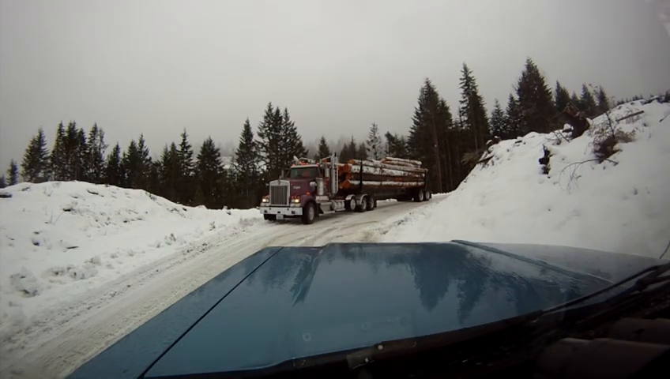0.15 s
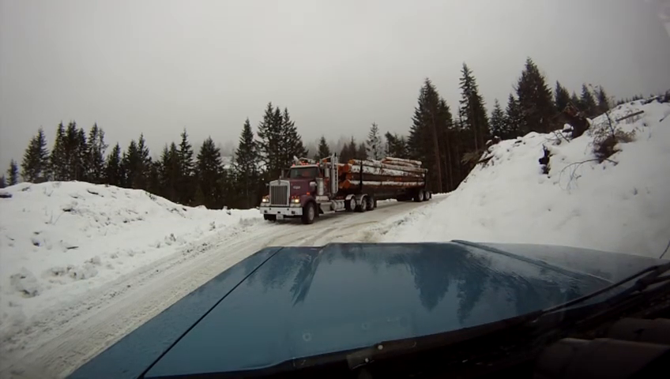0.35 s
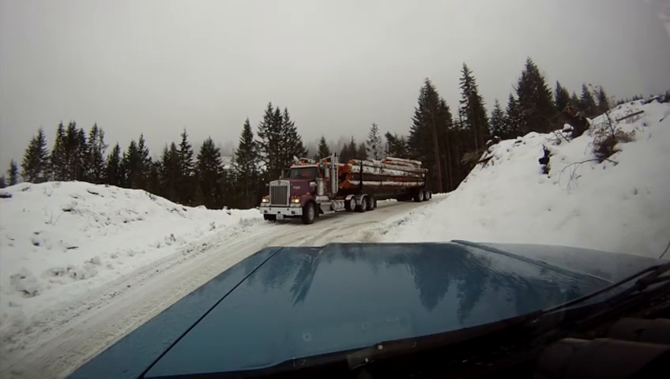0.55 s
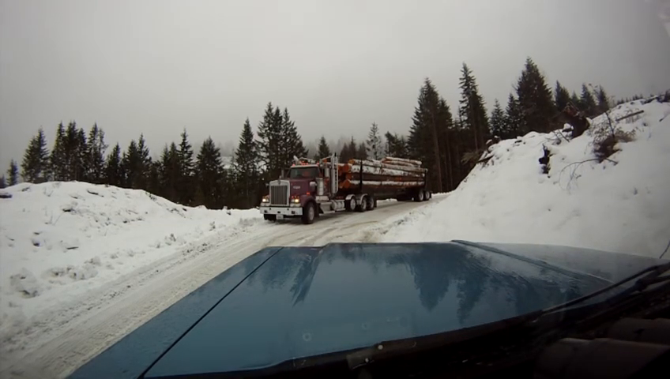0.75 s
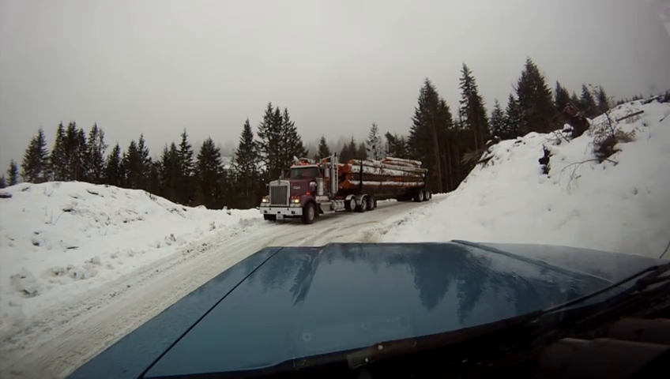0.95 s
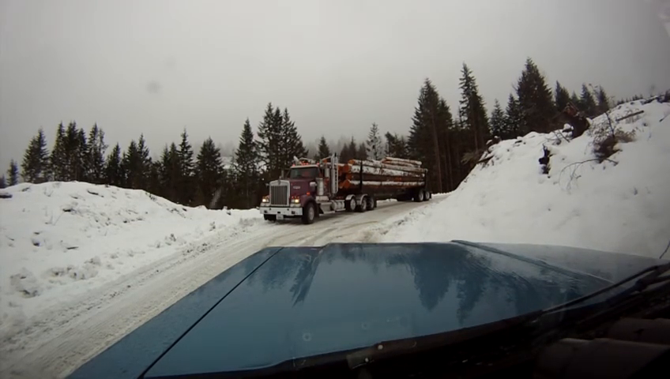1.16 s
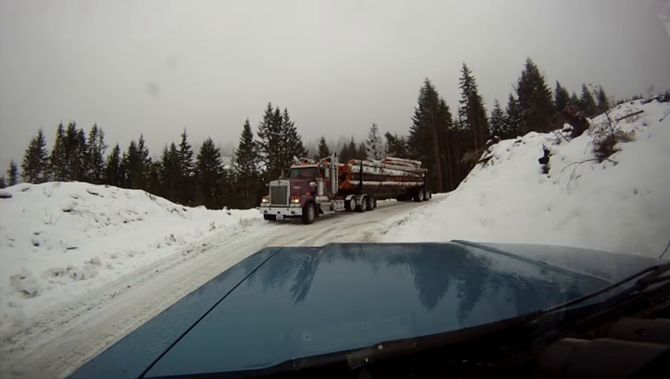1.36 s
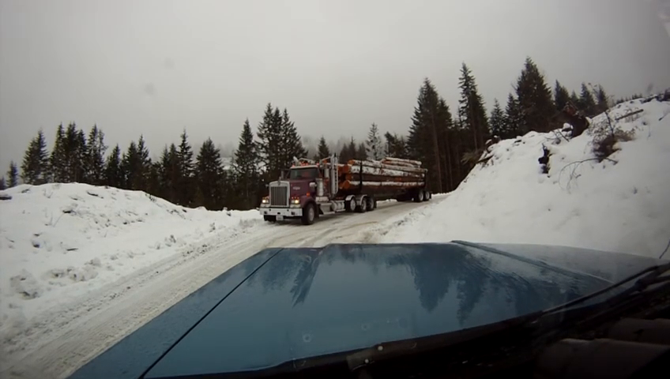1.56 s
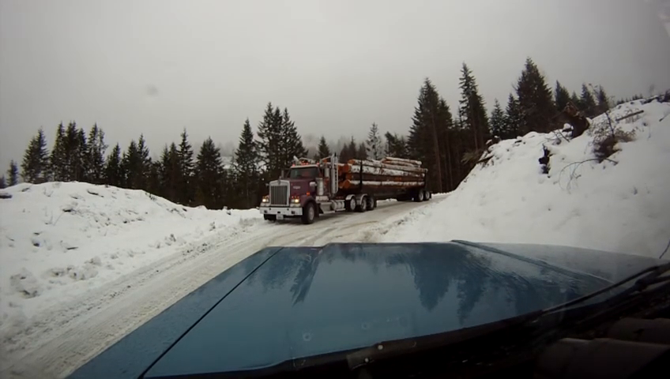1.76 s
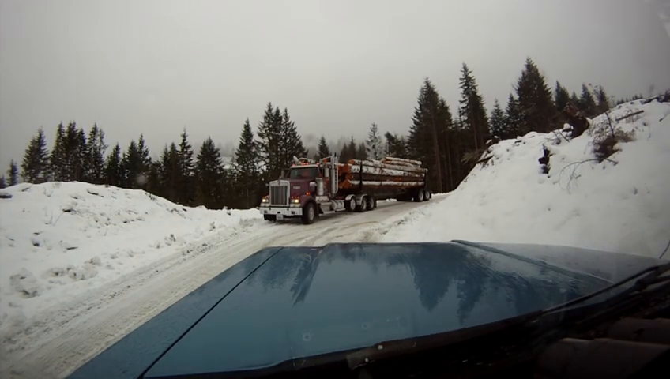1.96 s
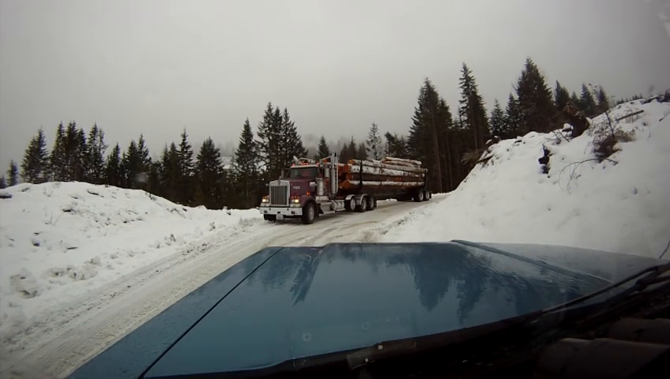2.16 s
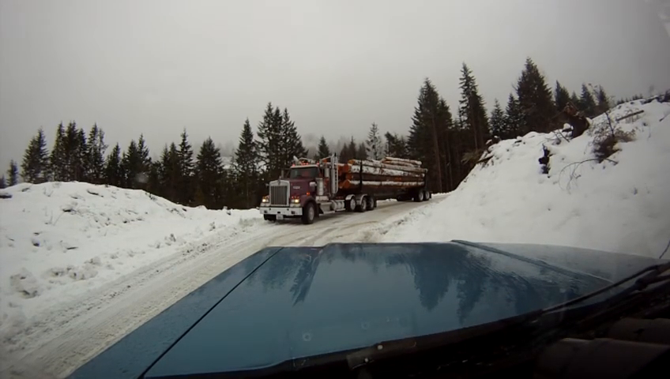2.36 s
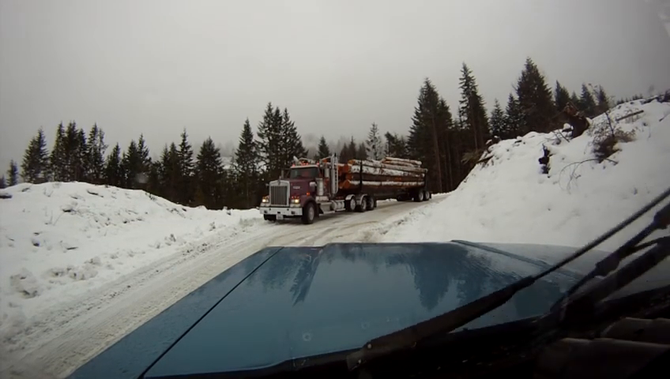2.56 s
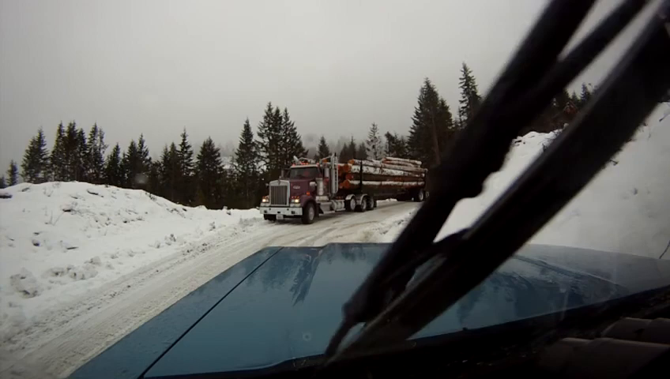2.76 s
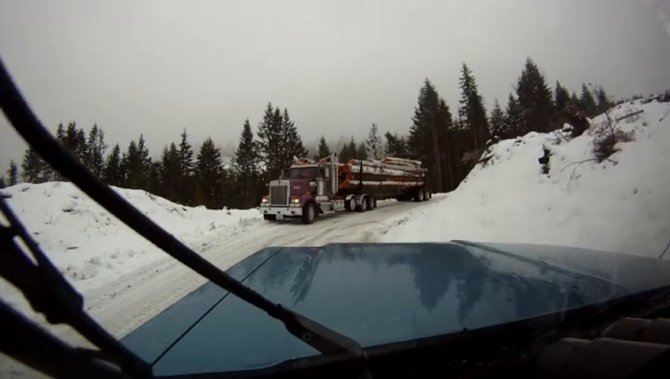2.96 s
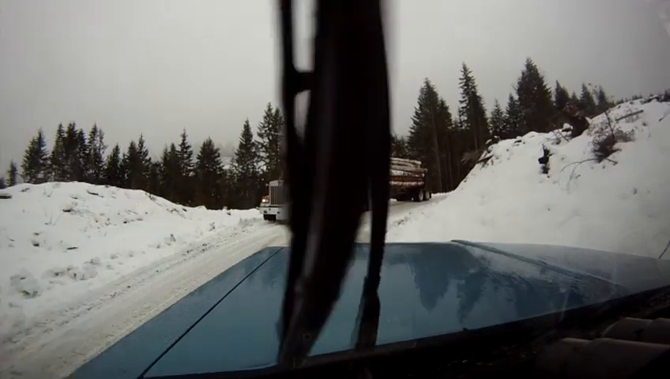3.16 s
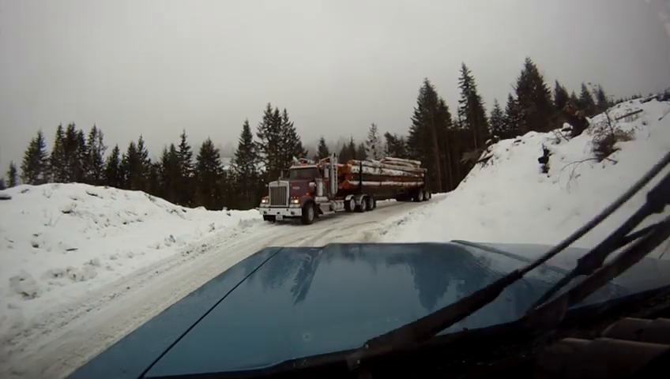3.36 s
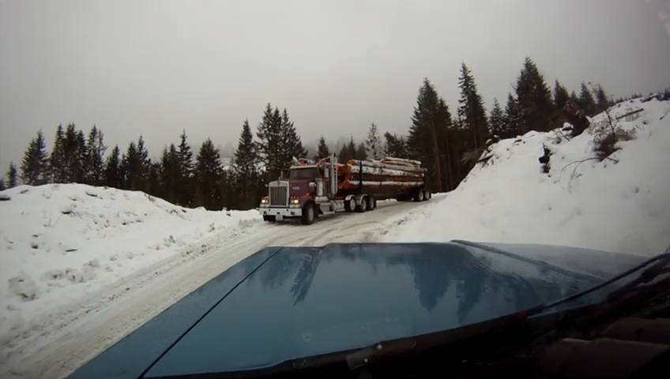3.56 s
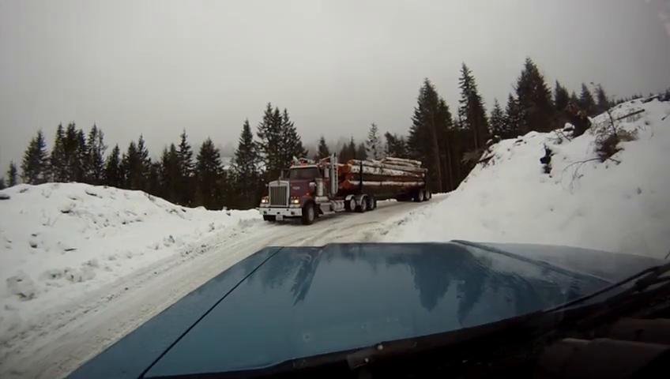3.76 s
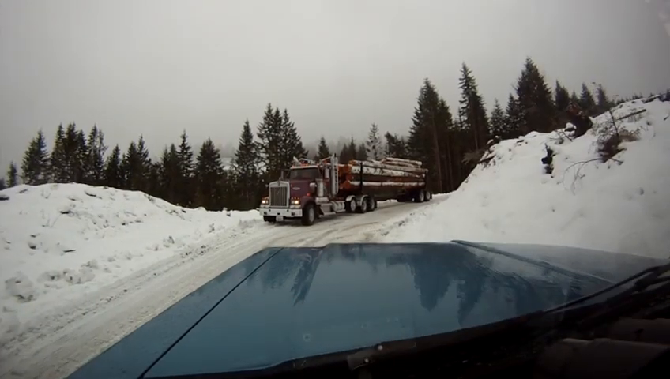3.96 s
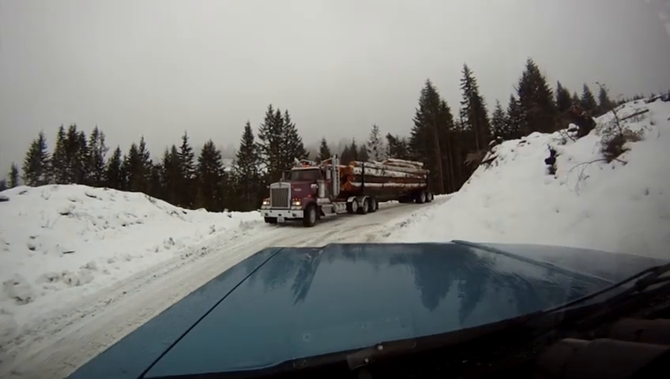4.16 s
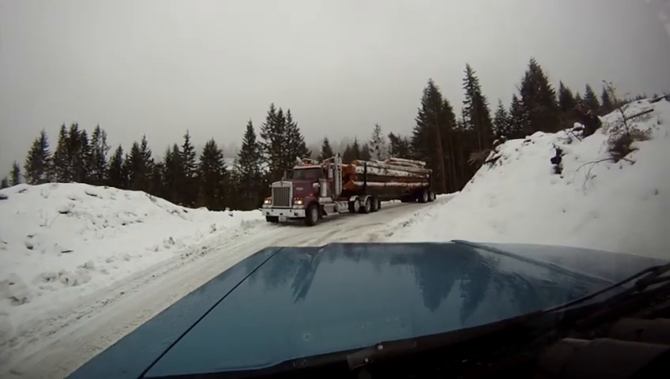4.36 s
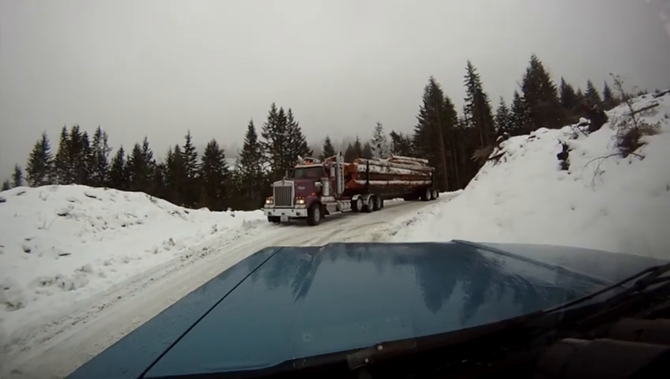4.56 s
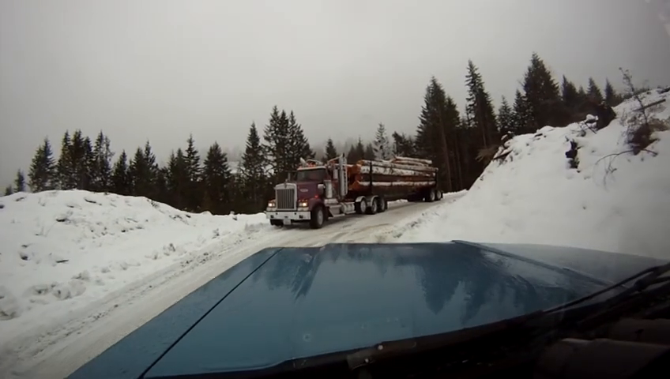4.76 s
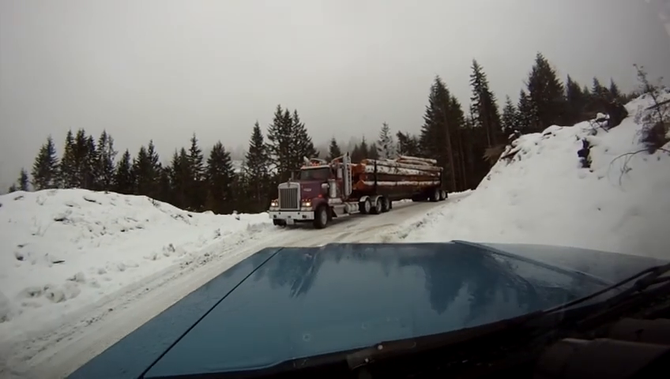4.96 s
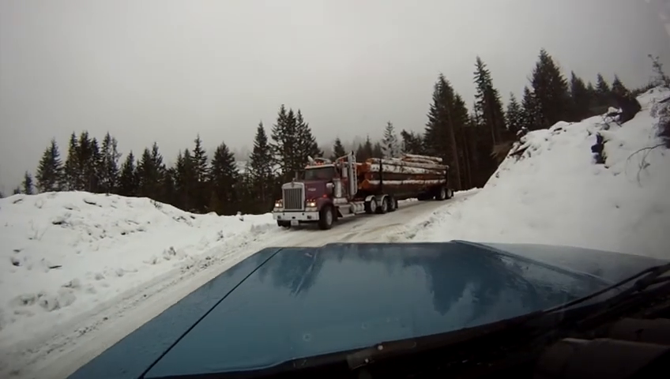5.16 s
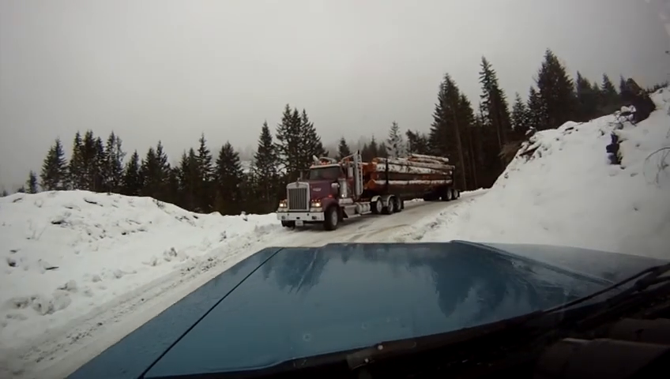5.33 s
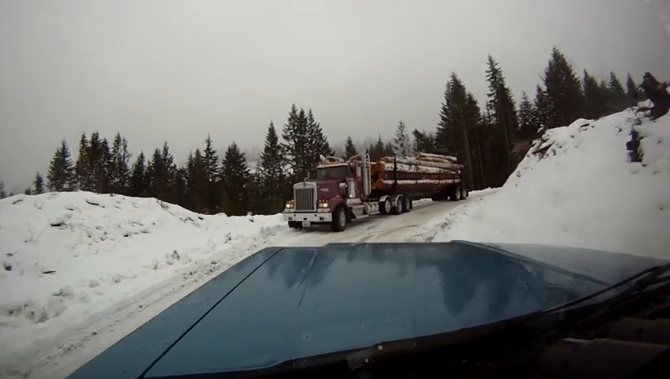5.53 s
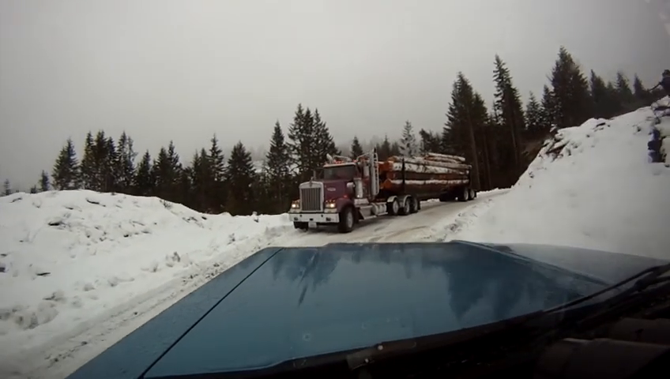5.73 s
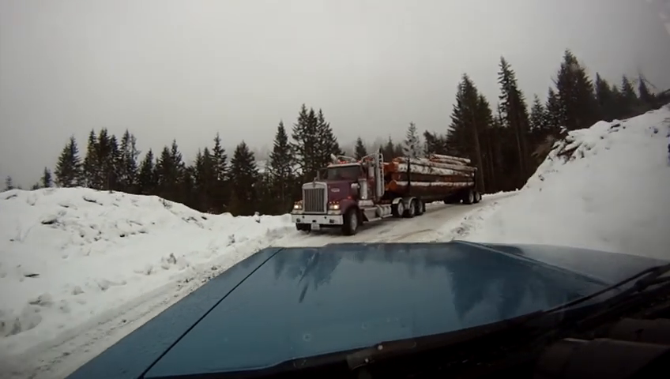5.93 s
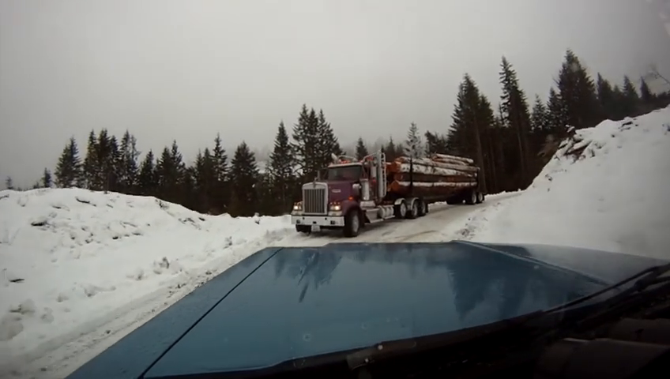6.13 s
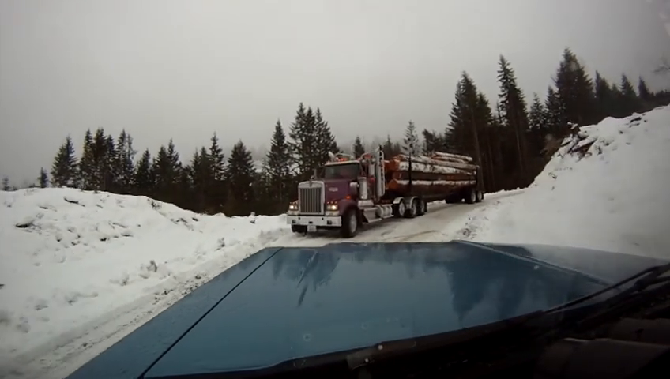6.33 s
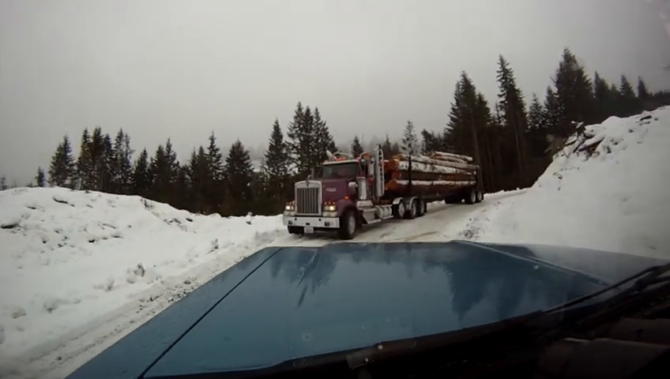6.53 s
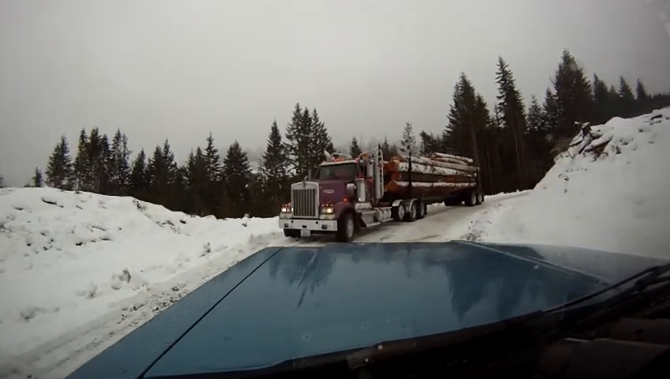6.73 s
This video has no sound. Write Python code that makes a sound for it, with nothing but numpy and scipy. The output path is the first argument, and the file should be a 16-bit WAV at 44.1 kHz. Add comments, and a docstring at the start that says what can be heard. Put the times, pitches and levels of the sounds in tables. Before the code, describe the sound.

Steady low diesel rumble in a vehicle cab, with a burst of hard knocks and wiper squeaks near three seconds, then a calmer, lugging pull.

```python
"""Diesel pickup on a snowy road

Inside the cab, a six-cylinder diesel thuds, buzzes and clatters: sines locked to its firings plus shaped noise.
Filtered noise makes the road's drumming and sway; damped sines make the cab boom at each jolt.
Loose gear knocks and scrapes on the dash, trim ticks (noise bursts), and wiper blades rub and squeak.
A dash camera with a coarse sample-and-hold converter picks it all up."""
import sys
import numpy as np
from scipy import signal
from scipy.fft import rfft, irfft, next_fast_len
from scipy.io import wavfile
from scipy.ndimage import map_coordinates

SR = 44100
rng = np.random.default_rng(int(sys.argv[2]) if len(sys.argv) > 2 else 0)


def store_wav(level_fs):
    """Save 16-bit WAV to argv[1]."""
    pcm = np.round(np.clip(np.atleast_2d(level_fs), -1, 1) * 32767)
    wavfile.write(sys.argv[1], SR, pcm.T.astype(np.int16))


N = 303849


def amp(db):
    """Level in dB to linear gain."""
    return 10 ** (np.asarray(db) / 20)


def unit(x):
    """Scale to an RMS of one."""
    return x / np.sqrt(np.mean(x ** 2) + 1e-20)


def along(points, hz):
    """Read a curve of (frequency [Hz], value) points on a log frequency axis."""
    f, v = np.transpose(points)
    return np.interp(np.log(hz + 1), np.log(f + 1), v)


def curve(points, lag_s=0):
    """Draw (time [s], value) points as one value per sample, optionally late."""
    s, value = np.transpose(points)
    return np.interp(np.arange(N) / SR - lag_s, s, value)


def wobble(rate):
    """A smooth random curve, rate knots a second."""
    knots = rng.standard_normal(int(N * rate / SR) + 4)
    return map_coordinates(knots, [np.arange(N) * rate / SR])


def swell(s, half):
    """A bell-shaped rise and fall around time s, down to 1/e at half seconds either side."""
    distance = (np.arange(N) / SR - s) / half
    return np.exp(-np.minimum(distance ** 2, 50))


def lift_db(modes, hz):
    """Gain of narrow resonances over a smooth colour."""
    return sum(db / (1 + (2 * (hz - centre) / width) ** 2) for centre, width, db in modes)


def coloured(x, db_of):
    """x through the causal minimum-phase filter whose gain in dB is db_of(Hz)."""
    m = 2 * next_fast_len(len(x))
    cepstrum = irfft(np.log(amp(db_of(np.fft.rfftfreq(m, 1 / SR))) + 1e-6))
    # fold the cepstrum forward in time, so the filter never rings before its cause
    cepstrum[1:m // 2] *= 2
    cepstrum[m // 2 + 1:] = 0
    return irfft(rfft(x, m) * np.exp(rfft(cepstrum)))[:len(x)]


def add(track, s, sound):
    """Mix a sound into the track at time s."""
    part = track[round(s * SR):][:len(sound)]
    part += sound[:len(part)]


# load on the engine, eased off and then opened to pull away: (time [s], level over idle [dB])
LOAD_CURVE = [(0, -0.5), (1.9, 1.2), (2.3, -1), (3.2, -0.5), (3.32, 3.5), (6.89, 3)]


def engine_load(lag_s=0):
    """Load over idle in dB; it drives the engine directly and the road noise with a lag."""
    return curve(LOAD_CURVE, lag_s)


# drumming of the cab: (frequency [Hz], relative level [dB])
DRUM_COLOUR = [(20, -41), (45, -27), (62, -4.5), (100, 2), (170, -1.5), (228, 4), (262, -8.5), (310, -17.5),
               (420, -28), (900, -50)]
# sway of the body on its springs: (frequency [Hz], relative level [dB])
SWAY_COLOUR = [(8, -12), (24, 8.5), (45, -6), (65, -7), (150, -64.5)]
# ruts under the wheels: (time [s], half length [s], drumming level [dB], sway level [dB])
RUT_HITS = [(0.853, 0.28, -32.5, -43), (1.32, .12, -46, -30), (1.677, 0.11, -24.5, -22),
            (2.102, 0.045, -25, -38), (2.903, 0.064, -21, -29), (4.75, 0.27, -41, -34),
            (6.095, 0.084, -28, -30)]
DRUM_DB, SWAY_DB = -38, -41.5  # levels at idle load
DRUM_GROWS, SWAY_GROWS = 1.05, 2.4  # dB of each per dB of load
ROLL_LAG_S = 0.26  # the wheels follow the throttle this much later


def road(uneven_db=1.0):
    """Tyres on snow rock the body and make the cab drum, more under load and in every rut."""
    load_db = engine_load(ROLL_LAG_S)
    drum = amp(DRUM_DB + DRUM_GROWS * load_db)
    sway = amp(SWAY_DB + SWAY_GROWS * load_db)
    for s, half, drum_db, sway_db in RUT_HITS:
        rut = swell(s, half)
        drum = np.hypot(drum, amp(drum_db) * rut)
        sway = np.hypot(sway, amp(sway_db) * rut)

    def noise(colour):
        return unit(coloured(rng.standard_normal(N), lambda hz: along(colour, hz)))

    return drum * amp(uneven_db * wobble(10)) * noise(DRUM_COLOUR) + sway * noise(SWAY_COLOUR)


# low modes of the cab: (frequency [Hz], level [dB], t60 [s])
CAB_RESONANCES = [(75.5, -3.5, 0.14), (112, -2.5, 0.13), (151, -2, 0.069), (193.2, -1.5, 0.2),
                  (229.9, 0, 0.24)]
# jolts that ring the cab: (time [s], level [dB], rise [s], favoured pitch [Hz], reach around it [octaves])
CAB_JOLTS = [(.66, -23, 0.01, 233, 0.2), (0.823, -17.5, 0.0053, 226, 0.11), (.994, -20, 0.0052, 230, .12),
             (1.155, -22.5, .022, 227, 0.22), (1.532, -5, 0.0015, 70, 1.07), (1.752, -24, 0.021, 232, .12),
             (1.825, -20, 0.013, 229, 0.19), (1.894, -21, 0.027, 229, .12), (2.07, -17, 0.0015, 220, 1.1),
             (2.521, -16, .015, 150, 0.92), (2.785, -14.5, 0.016, 190, 0.23),
             (2.863, -6.5, .0024, 149, 0.22), (2.89, -15, .01, 196, 0.073), (2.982, -19, .012, 190, 0.16),
             (6.045, -17.5, 0.0044, 125, 1)]


def booms(rough_db=2.0):
    """Each jolt sets the low modes of the cab swinging unevenly, most of all those near its favoured pitch."""
    out, t = np.zeros(N), np.arange(SR // 2) / SR
    shudder = amp(rough_db * wobble(60))
    for s, db, rise, favoured_hz, reach in CAB_JOLTS:
        for hz, mode_db, t60 in CAB_RESONANCES:
            envelope = (1 - np.exp(-t / rise)) * amp(-60 * t / t60)
            envelope = envelope / envelope.max()
            share = np.exp(-abs(np.log2(hz / favoured_hz)) / reach)
            add(out, s, amp(db + mode_db) * share * envelope * np.sin(2 * np.pi * hz * t))
    return out * shudder


# small ticks of trim: (time [s], level [dB])
TRIM_TICKS = [(0.155, -50), (1.1258, -49), (2.9924, -46), (4.7301, -46.5), (4.807, -48.5), (5.8232, -57),
              (5.914, -59), (6.0397, -48)]


def ticks(t60=0.058):
    """Plastic trim ticks faintly as the body flexes: short decaying bursts of treble noise."""
    out, t = np.zeros(N), np.arange(SR // 16) / SR
    plastic = [(1000, -13), (3500, -2), (5500, 2), (6500, -18)]  # (frequency [Hz], relative level [dB])
    for s, db in TRIM_TICKS:
        noise = unit(coloured(rng.standard_normal(len(t)), lambda hz: along(plastic, hz)))
        add(out, s, amp(db) * noise * amp(-60 * t / t60))
    return out


# squeaks of the wiper blades: (time [s], half length [s], pitch at that time [Hz], level [dB])
BLADE_SQUEAKS = [(2.66, .05, 2910, -46.5), (2.708, 0.013, 2430, -39), (2.756, 0.016, 2410, -27.5),
                 (2.787, 0.023, 5550, -43.5)]
# the blades rub over drier glass: (time [s], half length [s], level [dB])
BLADE_RUBS = [(2.8, 0.068, -37), (3.057, 0.061, -37), (3.128, 0.02, -30), (3.218, .025, -41.5)]
# colour of rubber on glass: (frequency [Hz], relative level [dB])
RUBBER_COLOUR = [(800, -36), (2300, 12), (3600, 2.5), (4500, -18), (5600, -13), (6500, -35)]
SAG_OCTAVES_PER_S = 0.37  # a squeak falls as the blade drags


def wiper(waver_hz=90, hoarse_db=3.0, stutter_db=3.0):
    """Rubber drags over the glass, rubbing in patches and catching in hoarse, falling squeaks."""
    t, squeak = np.arange(N) / SR, np.zeros(N)
    waver = waver_hz * wobble(500)
    for s, half, hz, db in BLADE_SQUEAKS:
        pitch = hz * 2 ** (-SAG_OCTAVES_PER_S * (t - s)) + waver
        tone = np.sqrt(2) * np.sin(2 * np.pi * np.cumsum(pitch) / SR)
        squeak += amp(db) * swell(s, half) * tone
    pressure = sum(amp(db) * swell(s, half) for s, half, db in BLADE_RUBS)
    rub = unit(coloured(rng.standard_normal(N), lambda hz: along(RUBBER_COLOUR, hz)))
    return amp(hoarse_db * wobble(150)) * squeak + pressure * amp(stutter_db * wobble(70)) * rub


# colour of the dash when struck: (frequency [Hz], relative level [dB])
DASH_COLOUR = [(60, -5.5), (220, 6.5), (400, -15.5), (700, -7.5), (1100, 0), (1600, -13.5), (2100, -1),
               (2700, -11), (3500, -13), (4400, -26), (5800, -26)]
# modes of the dash: (frequency [Hz], width [Hz], lift [dB])
DASH_RESONANCES = [(640, 20, 7.5), (1109, 30, 7), (1520, 176, 9.5), (1842, 304, 9), (2098, 21, 6.5),
                   (2580, 37, -4), (3070, 52, 4)]


def contacts(envelope, ring_hz, hard_db, ring_db, grain_db, spot_db=5, ring_width=0.062):
    """A crowd of tiny contacts under an envelope excites the dash; the spot that is hit favours one ring."""
    n = len(envelope)
    # grain levels change every 32 samples
    grain_levels_db = grain_db * rng.standard_normal(n // 32 + 1).repeat(32)[:n]
    grains = unit(rng.standard_normal(n) * amp(grain_levels_db))
    ring = (ring_hz, ring_width * ring_hz, ring_db)
    spot = (ring_hz, ring_hz, spot_db)
    modes = [*DASH_RESONANCES, ring, spot]

    def colour_db(hz):
        # hard contacts are brighter and thinner
        tilt = hard_db * along([(400, -0.39), (2200, -0.14), (4000, 0.81)], hz)
        return along(DASH_COLOUR, hz) + lift_db(modes, hz) + tilt

    sound = coloured(grains * envelope, colour_db)
    return unit(sound) * np.sqrt(np.mean(envelope ** 2))


# scrapes on the dash: (time [s], length [s], level [dB], strongest ring [Hz], hardness [dB, scales treble tilt])
DASH_SCRAPES = [(0.907, 0.08, -26, 1280, 1), (1.545, .125, -25.5, 1600, 3.5), (1.926, 0.093, -32, 2220, -2),
                (2.512, 0.04, -17.5, 1020, -11.5), (2.736, 0.056, -26, 2020, -2),
                (2.793, .03, -22.5, 1950, -3), (2.88, 0.05, -13, 1620, 2), (3.053, 0.017, -17.5, 1380, -4),
                (6.62, 0.051, -53, 3740, 9), (6.739, 0.063, -51, 4170, 6)]


def scrapes(spread=0.71, stutter_db=2.5):
    """Things stick and slip over the dash in swelling and fading strokes."""
    out, t = np.zeros(N), np.arange(SR // 2) / SR
    for s, length, db, hz, hard_db in DASH_SCRAPES:
        stroke = np.exp(-((t - length) / (spread * length)) ** 2)
        slips = unit(amp(stutter_db * wobble(192)[:len(t)]))
        sound = contacts(stroke * slips, hz, hard_db, ring_db=4.5, grain_db=1.0)
        add(out, s - length / 2, amp(db) * sound)  # the stroke peaks half a length after s
    return out


# knocks: (time [s], chatter length [s], level [dB], strongest ring [Hz],
#          hardness [dB, scales treble tilt], flight to the rebound [s], loss at the rebound [dB])
DASH_KNOCKS = [(0.674, 0.012, -18, 1130, 0.5, .012, 9), (1.197, 0.0016, -15.5, 1060, -9.5, .014, 7),
               (1.529, 0.0037, -8, 2380, 5, .028, 9), (1.733, 0.006, -22.5, 1063, 2.5, 0.015, 2.5),
               (1.826, 0.011, -8.5, 1180, -10, .009, 15), (1.914, 0.008, -25, 2050, -6.5, 0.026, 5),
               (2.07, 0.0063, -15.5, 1250, -5, .018, 4.5), (2.86, 0.0036, -6.5, 1164, 3.5, .033, 8),
               (3.069, 0.0034, -0.5, 1960, 6, .045, 18.5)]
CRACK_S, CRACK_DB, CRACK_PER_HARD_DB = 0.0019, -17, 2.3  # decay, level re knock, dB per dB of hardness
REBOUND_CHATTER_S, REBOUND_HARDER_DB = 0.0069, 0.5  # a rebound chatters briefly and sounds thinner


def knocks(t60=0.051, rise=0.000057):
    """Loose gear hits with a crack, chatters for a few milliseconds, rebounds once and leaves the dash ringing."""
    out, t = np.zeros(N), np.arange(SR // 5) / SR

    def blow(length, hz, hard_db):
        envelope = (1 - np.exp(-t / rise)) * amp(-60 * np.maximum(t - length, 0) / t60)
        return contacts(envelope, hz, hard_db, ring_db=9.0, grain_db=0.0)

    for s, length, db, hz, hard_db, flight, loss_db in DASH_KNOCKS:
        add(out, s, amp(db) * blow(length, hz, hard_db))
        crack = np.exp(-t / CRACK_S) * rng.standard_normal(len(t))
        add(out, s, amp(db + CRACK_DB + CRACK_PER_HARD_DB * hard_db) * crack)
        rebound = blow(REBOUND_CHATTER_S, hz, hard_db + REBOUND_HARDER_DB)
        add(out, s + flight, amp(db - loss_db) * rebound)
    return out


# colour of the clatter behind the firewall: (frequency [Hz], relative level [dB])
CLATTER_COLOUR = [(200, -38), (330, -24.5), (460, -26.5), (600, -11), (780, -15.5), (950, -5.5), (1160, 1),
                  (1350, -3), (1480, -10.5), (1700, -14), (1950, 1.5), (2130, -3.5), (2300, -18),
                  (2500, -21.5), (3300, -32), (4300, -40.5), (5500, -42), (6000, -63)]
# narrow rings of block and cab: (frequency [Hz], width [Hz], lift [dB])
BLOCK_RINGS = [(570, 15, 6), (868.4, 12.3, 13), (2424, 107, 7.5), (2786, 175, 10), (3160, 47, 8),
               (3623, 350, 9)]


def clatter(firings, rate, alike=0.22, swing_db=10, scatter_db=1.0, cylinder_db=0.5):
    """Each firing rattles the block: partly the same way every time, partly anew."""
    index, part = firings.astype(int), firings % 1
    pattern = rng.standard_normal(SR // 8)
    repeated = np.interp(part / rate * SR, np.arange(len(pattern)), pattern)
    rattle = np.sqrt(alike) * repeated + np.sqrt(1 - alike) * rng.standard_normal(N)
    cylinders = unit(rng.standard_normal(size=6))
    size_db = cylinder_db * cylinders[index % 6] + scatter_db * rng.standard_normal(size=1000)[index]
    # the engine bay smears each firing into a quick swell and a slower fade
    swell_db = swing_db * np.interp(part, [0, 1 / 4, 1 / 2, 1], [-1.01, -0.22, -0.27, -0.64])
    bursts = rattle * amp(size_db + swell_db)
    return unit(coloured(bursts, lambda hz: along(CLATTER_COLOUR, hz) + lift_db(BLOCK_RINGS, hz)))


# engine speed: (time [s], firing rate [Hz])
FIRING_RATE = [(0, 41.1), (2.7, 42.4), (3.1, 45.2), (3.6, 39.4), (4.05, 39.2), (4.35, 38.4), (5.0, 36.9),
               (5.5, 39.7), (5.9, 40.3), (6.1, 41.8), (6.55, 43.8), (6.89, 43.3)]
# smooth engine orders: (multiple of the firing rate, level [dB])
THUD_ORDERS = [(1, -1), (2, -9.5), (3, -18.5), (4, -23.5)]
# panels that buzz when an engine order meets them: (multiple of the firing rate, panel [Hz], width [Hz], level [dB])
BUZZING_PANELS = [(6, 246, 16.7, -39), (21, 862, 20, -45.5), (18, 740, 49, -53), (28, 1150, 28, -49),
                  (27, 1160, 14, -33.5)]
CLATTER_DB, THUD_DB = -34, -35  # combustion clatter and firing thud at idle load
THUD_GROWS = 0.94  # dB of thud per dB of load
THUD_FADES = 1.8  # off the throttle the thud falls away faster: extra dB per dB of load below idle
LUG_HZ, LUG_DB, LUG_WIDTH_HZ = 39.7, 4.5, 0.76  # dragged below this firing rate, it lugs and thuds harder


def engine(unsteady=0.002884):
    """Firing thud, panel buzz and diesel clatter, locked to the crankshaft; thud and clatter follow the load."""
    rate = curve(FIRING_RATE)
    load_db = engine_load()
    lug_db = LUG_DB / (1 + np.exp((rate - LUG_HZ) / LUG_WIDTH_HZ))
    thud_db = THUD_DB + THUD_GROWS * load_db + THUD_FADES * np.minimum(load_db, 0) + lug_db
    rate = rate * (1 + unsteady * wobble(12))
    firings = np.cumsum(rate) / SR

    def tone(order):
        return np.sqrt(2) * np.sin(2 * np.pi * order * firings)

    thud = sum(amp(db + 1.8 * wobble(7)) * tone(order) for order, db in THUD_ORDERS)
    buzz = np.zeros(N)
    for order, hz, width, db in BUZZING_PANELS:
        detuning = 2 * (order * rate - hz) / width
        buzz += amp(db + 2.3 * wobble(22)) * tone(order) / np.hypot(1, detuning)
    return amp(thud_db) * thud + buzz + amp(CLATTER_DB + load_db) * clatter(firings, rate)


def scene():
    """The whole cab, background first, as one channel."""
    return (road() + booms() + ticks() + wiper() + scrapes() + knocks() + engine())[None]


DUCK_DB, DUCK_SHARE = -21, 0.34  # threshold, share of the excess removed
DUCK_LAG_S, DUCK_RELEASE_S = 0.0145, 0.087  # delay, time constant of the level meter


def gain_control(x):
    """The camera turns itself down after a loud bang and soon recovers."""
    keep = np.exp(-1 / (DUCK_RELEASE_S * SR))
    power = signal.lfilter([1 - keep], [1, -keep], x[0] ** 2)
    level_db = 10 * np.log10(power + 1e-12)
    t = np.arange(N) / SR
    excess_db = np.interp(t - DUCK_LAG_S, t, np.maximum(level_db - DUCK_DB, 0))
    return x * amp(-DUCK_SHARE * excess_db)


TOP_HZ = 15450  # nothing passes above this


def record(dry):
    """The camera ducks, clips, samples at 12 kHz and holds each value, which mirrors sound into the treble."""
    fine = signal.resample_poly(gain_control(dry), 160, 147, axis=1)  # 44.1 to 48 kHz
    coarse = np.clip(signal.resample_poly(fine, 1, 4, axis=1), -.95, .95)  # 12 kHz
    held = signal.resample_poly(coarse.repeat(4, axis=1), 147, 160, axis=1)[:, :N]
    return irfft(rfft(held) * (np.fft.rfftfreq(N, 1 / SR) < TOP_HZ), N)


dry = scene()
out = record(dry)
store_wav(out)
```